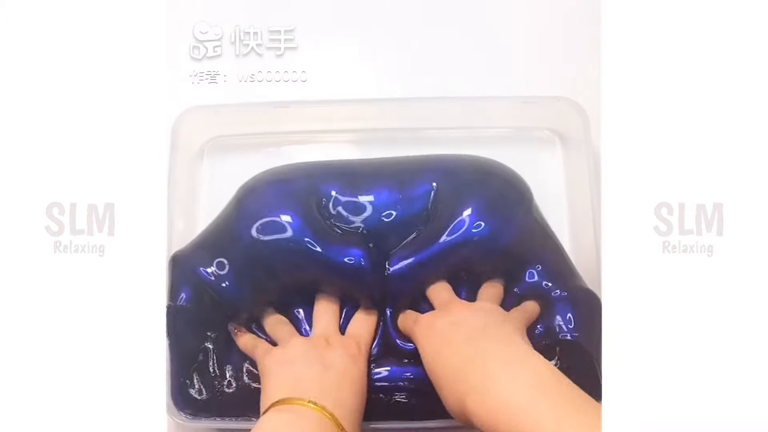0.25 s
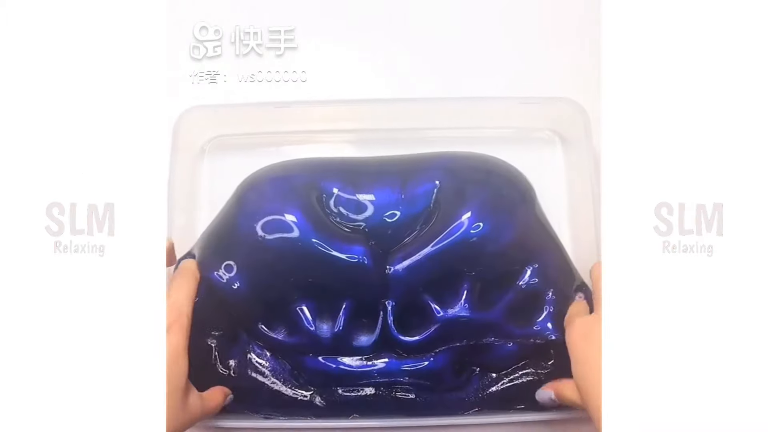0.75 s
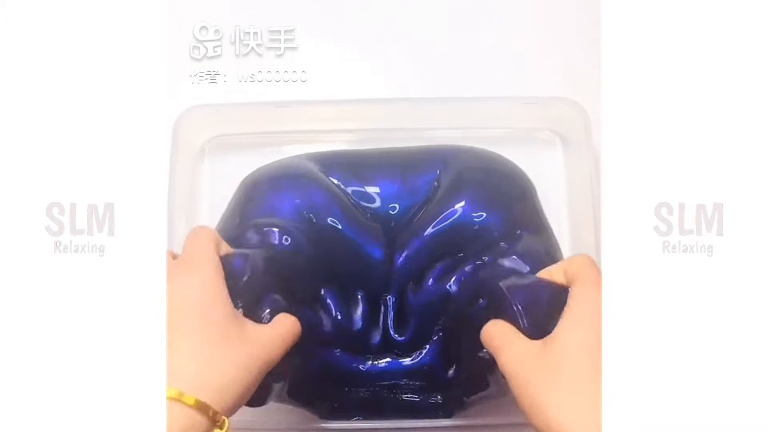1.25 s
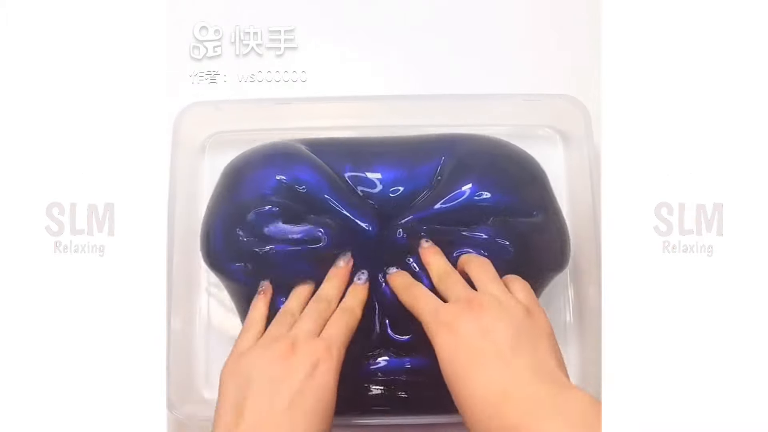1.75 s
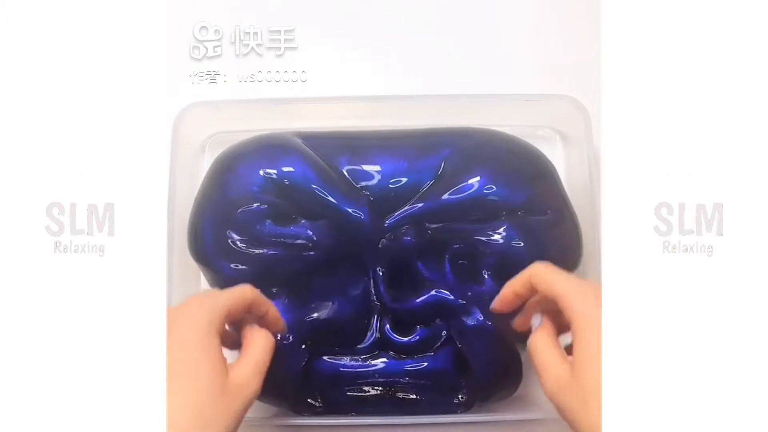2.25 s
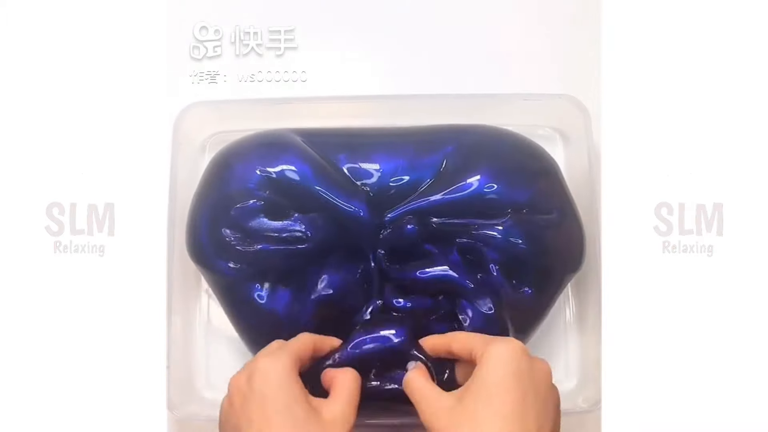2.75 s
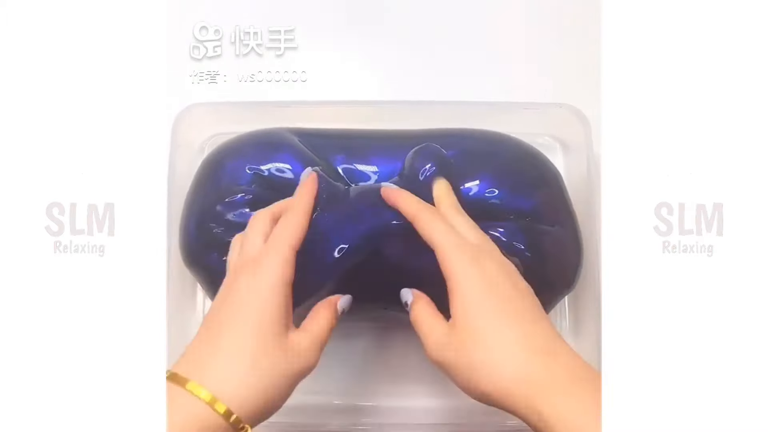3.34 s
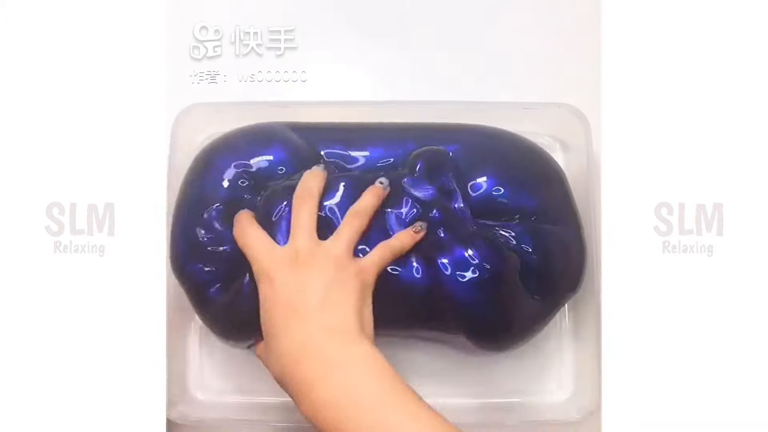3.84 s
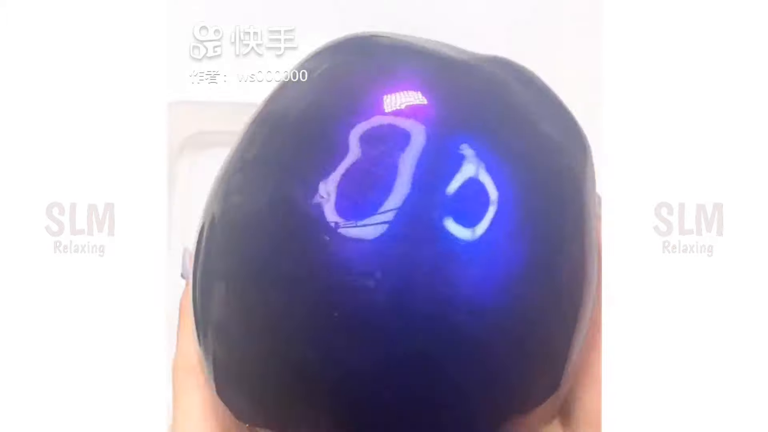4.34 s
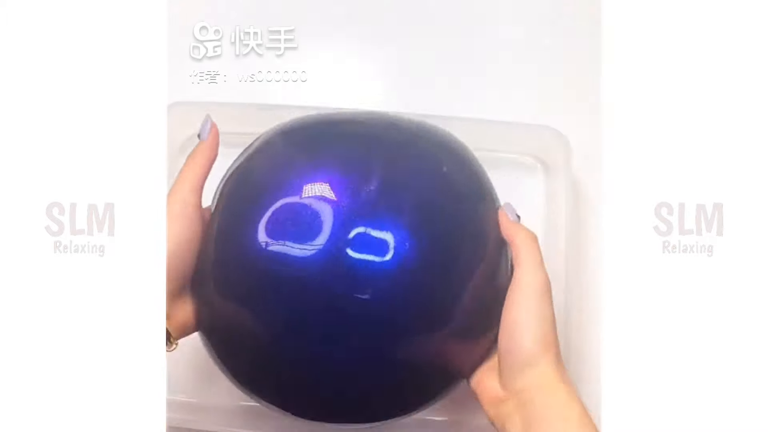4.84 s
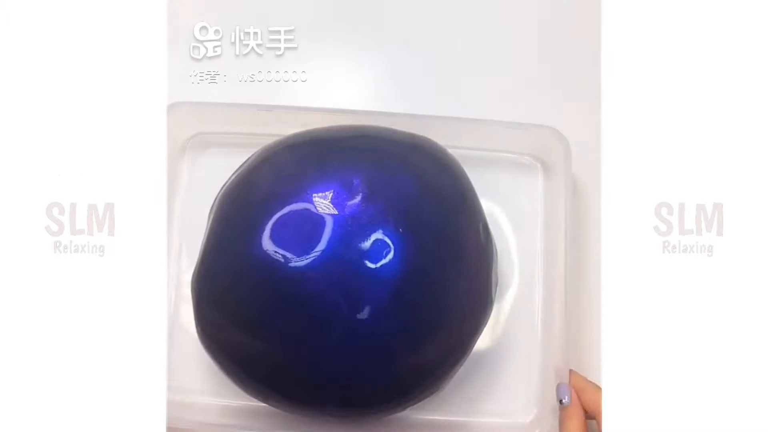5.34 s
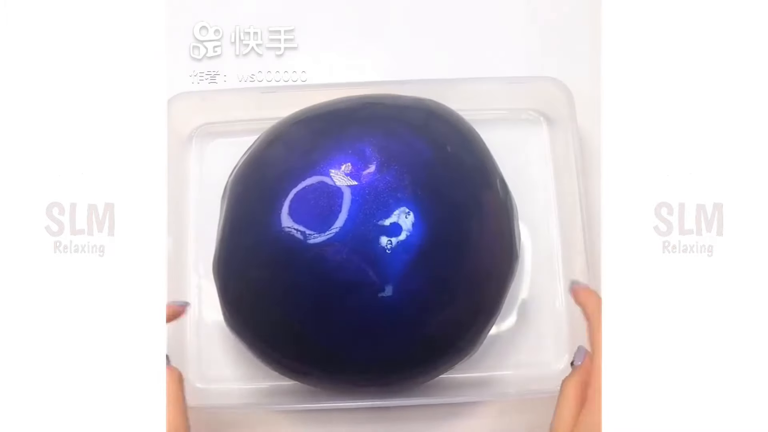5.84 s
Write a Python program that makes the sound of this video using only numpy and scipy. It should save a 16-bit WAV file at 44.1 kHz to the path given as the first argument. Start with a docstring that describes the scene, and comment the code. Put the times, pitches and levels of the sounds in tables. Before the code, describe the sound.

Fingers press and fold sticky slime in a plastic tray, with sharp wet pops, snapping crackles and soft tray thumps, very close.

```python
"""Small room: fingers press, fold and lift a slab of sticky slime in a plastic tray, close to a phone microphone.
Bursting air pockets are short gusts of sine and resonant noise, with a crack, a hollow ring and a wet tail.
Rips are dense tiny snaps and sucked-in air; sliding, swish, crackle, rumble and hiss are coloured noise.
The tray is three resonances struck by soft tugs; the loudest peaks overload the recorder."""
import sys
import numpy as np
from scipy import signal
from scipy.fft import rfft, irfft
from scipy.io import wavfile
from scipy.ndimage import uniform_filter1d

SR = 44100
rng = np.random.default_rng(int(sys.argv[2]) if len(sys.argv) > 2 else 0)


def digitize_waveform(pressure):
    """Quantize a signal to 16-bit integers and store it at the path in sys.argv[1].

    Rows of a 2-D input are taken as channels; values are limited to [-1, 1].
    """
    field = np.atleast_2d(pressure).T
    bounded = np.clip(field, -1, 1)
    quanta = np.round(bounded * 32767).astype(np.int16)
    wavfile.write(sys.argv[1], SR, quanta)


N = 269010

# Spectra: (frequency [Hz], relative level [dB])
HISS_SPECTRUM = [(350, -36), (600, 1.5), (1330, -11.5), (6200, -12.5), (14900, -15), (16000, -12)]
RUMBLE_SPECTRUM = [(15, -105), (25, -26), (97, 10), (144, -2.5), (189, -4.5), (317, -7), (638, -10.5),
                   (880, -16), (1800, -19), (2340, -23), (3960, -120)]
SLIDING_SPECTRUM = [(700, -38.5), (1300, -13), (1900, -5), (2450, -1.5), (3200, -4), (4500, -7.5),
                    (5900, -20.5)]
CRACKLE_SPECTRUM = [(2240, -85), (3800, -4), (5420, 7), (8360, 1), (15200, -5.5), (16000, -101)]
SWISH_SPECTRUM = [(530, -51), (900, -15), (3000, 0), (4860, -4), (11400, -10), (16000, -13)]
TEAR_SPECTRUM = [(530, -44), (900, -15.5), (1190, -7.5), (1320, -10), (2330, -7), (3300, -8), (5820, -4.5),
                 (16000, -16)]
# Overall gain, dips briefly, then sits 1 dB below its start: (time [s], gain [dB])
OVERALL_GAIN = [(4.07, -3.5), (4.078, -27), (4.108, -17), (4.115, -4.5)]
# Low rumble between bursts: (time [s], level [dB])
RUMBLE_LEVEL = [(0.0, -46.5), (1.6, -45.5), (2.6, -47), (3.1, -46), (3.9, -45), (4.4, -47), (5.0, -49.5),
                (5.6, -44.5), (6.1, -47.5)]
# Tray resonances: (frequency [Hz], gain [dB], t60 [s])
TRAY_MODES = [(99.3, -8, 0.38), (185.2, 7, 0.22), (402, 2, 0.036)]
# Gel tugging at the tray: (time [s], level [dB])
TRAY_TUGS = [(0.278, -37.5), (0.338, -44), (0.587, -29), (0.649, -30), (0.821, -36.5), (0.902, -44),
             (0.946, -36.5), (1.07, -29), (1.099, -52), (1.178, -36), (1.249, -35.5), (1.62, -43),
             (2.332, -45.5), (2.365, -31), (2.52, -36), (2.917, -47), (3.824, -40), (5.299, -34)]
# Hands moving over the gel: (time [s], wet sliding level [dB], fine crackle level [dB])
KNEADING_LEVELS = [(0.0, -51, -48), (0.3, -57, -59), (0.46, -53, -55), (0.78, -61.5, -66),
                   (1.05, -48, -47.5), (1.41, -59, -46), (1.56, -54, -43), (1.75, -68, -70),
                   (2.0, -58, -60), (2.06, -52, -53), (2.3, -54.5, -57), (2.45, -78, -87.5),
                   (2.84, -53, -49.5), (3.02, -59, -52.5), (3.14, -43, -60), (3.26, -48, -47),
                   (3.45, -49, -47), (3.75, -66.5, -63), (4.03, -51.5, -55), (4.3, -58.5, -58.5),
                   (5.1, -63, -62), (5.8, -66, -73), (5.97, -47.5, -54), (6.1, -91, -85)]
# Gel tearing off skin and tray: (top reached [s], level [dB], swell before [s], held [s],
# sag while held [dB], release [s], low squelch re level [dB])
RIP_STROKES = [(0.209, -39, 0.025, 0.08, 5, 0.025, -8), (0.588, -8, 0.0079, 0.055, 21, 0.064, -12.5),
               (0.891, -30, 0.012, 0.041, 16.5, 0.069, -5.5), (1.1, -46, 0.038, 0.04, 19, 0.03, -11),
               (1.17, -28.5, 0.01, 0.082, 14.5, 0.043, -23), (1.359, -49.5, 0.038, 0.033, 2, 0.017, -11),
               (1.448, -42, 0.043, 0.11, 0.5, 0.018, -34), (1.719, -45.5, 0.011, 0.032, 6, 0.02, -17),
               (2.318, -14, 0.023, 0.041, 3.5, 0.045, -15), (2.916, -28.5, 0.1, 0.055, 10.5, 0.059, -3),
               (3.15, -39, 0.055, 0.011, 9, 0.036, -9), (3.354, -36, 0.03, 0.018, 9, 0.023, -11),
               (3.791, -32, 0.05, 0.039, 5.5, 0.044, -19), (4.25, -35.5, 0.049, 0.12, 10.5, 0.042, -12.5),
               (4.597, -32, 0.13, 0.038, 19, 0.023, -37), (5.121, -42, 0.025, 0.1, -4, 0.02, 0),
               (5.266, -16, 0.016, 0.021, 8.5, 0.025, -12.5), (5.299, -45.5, 0.01, 0.091, 19, 0.02, 12.5)]
# Bursting pockets: (time [s], level [dB], nominal pocket pitch [Hz], hollow pitch [Hz],
# hollow re level [dB], crack re level [dB])
POCKETS = [(0.023, -32, 2400, 860, -7, -2.5), (0.078, -33.5, 4270, 854, -22, -12),
           (0.132, -38.5, 1600, 590, 15, -20), (0.19, -42, 6600, 393, -20.5, -12),
           (0.205, -34.5, 4730, 423, -15, -8), (0.229, -34, 4730, 780, -19, -8),
           (0.252, -16.5, 4240, 460, -24, -21), (0.263, -31, 4350, 387, -27.5, 0),
           (0.27, -13, 7520, 450, -15, -5), (0.323, -6, 5915, 470, -20, 2.5),
           (0.432, -34, 5300, 590, -27, 0.5), (0.495, -27, 2040, 538, -19, -18.5),
           (0.543, -26.5, 1980, 465, -5, -18), (0.555, -25, 1940, 706, -12, -9),
           (0.576, -7, 2320, 1460, -17, -0.5), (0.589, -4.5, 2030, 1170, -17, -15),
           (0.614, -20, 4900, 1180, 11, -6), (0.634, -19, 4800, 356, -12, -12),
           (0.813, -15.5, 2570, 1480, -25, -4), (0.834, -19, 2710, 460, -10.5, -16),
           (0.883, -24.5, 1790, 770, 0.5, -22), (0.91, -28.5, 2320, 532, 2, -16),
           (0.938, -24, 2070, 503, 1, -1), (1.015, -38, 2340, 1100, 15, -22),
           (1.036, -30.5, 3980, 514, 3.5, -7), (1.059, -12.5, 2230, 1470, -19, -14.5),
           (1.091, -7, 2270, 1240, 0, -18), (1.1, -11.5, 4100, 610, -13, -29),
           (1.11, -30, 5990, 630, 7.5, -18), (1.144, -8, 4320, 645, -38, -2.5),
           (1.17, -8.5, 3750, 526, -6, -3.5), (1.185, -8.5, 3450, 546, -16.5, -9),
           (1.23, -21.5, 2320, 435, -8.5, -22), (1.243, -18, 2620, 1230, -11, -12),
           (1.26, -24, 1560, 990, -21, -7.5), (1.327, -39.5, 1780, 1160, 7, -12),
           (1.352, -26, 7460, 783, -27, -6), (1.443, -33.5, 6200, 366, -7, 4.5),
           (1.521, -33, 8270, 1470, -28, -8), (1.544, -24.5, 5450, 1400, -30, -5),
           (1.72, -41, 2980, 586, -18, -3), (1.783, -39.5, 2970, 1270, -17, 1.5),
           (1.794, -41.5, 6200, 600, -23, -6), (1.877, -48, 5870, 604, -20, -3),
           (1.95, -33.5, 4270, 395, -22, -4.5), (2.018, -30, 7200, 395, -20, -15.5),
           (2.0238, -9.5, 7270, 1210, -42, -16), (2.0266, -12, 6530, 1400, -42, -23),
           (2.126, -37.5, 5980, 413, -8, -17), (2.143, -37.5, 6200, 385, -14, -12),
           (2.156, -44.5, 5660, 402, -8, -7), (2.265, -48, 6340, 402, -6, -14),
           (2.313, -17.5, 7070, 686, -26, 6.5), (2.323, -11, 5780, 386, -3.5, 4),
           (2.333, -12, 4800, 414, -11, -15), (2.508, -10.5, 1930, 597, -10, -10),
           (2.882, -34, 7600, 730, -1, -8.5), (2.895, -33, 4360, 490, -19, -17),
           (2.915, -21, 1350, 953, 4, -20.5), (2.967, -31.5, 5500, 374, -22, -1),
           (3.23, -34.5, 6830, 840, -10, -8), (3.298, -35.5, 2400, 1440, -21, -10),
           (3.347, -31.5, 9700, 657, -28, -23), (3.359, -32.5, 4400, 630, -19, 1),
           (3.706, -42.5, 6270, 604, 8, -10), (3.791, -25, 6150, 428, -31, 5),
           (3.813, -26, 3940, 447, -26, -19), (4.115, -33.5, 1530, 1540, 1, -2.5),
           (4.247, -30.5, 9100, 970, -2, -12), (4.264, -27.5, 3630, 906, 0, -18),
           (4.364, -35, 4130, 880, -28, 3), (4.444, -47, 5500, 600, -20, -6),
           (4.467, -48, 4460, 595, -25, -20), (4.56, -34, 4730, 977, -28, -1),
           (4.576, -27, 8300, 670, -16, -6), (4.595, -19, 5430, 1290, 1, -24),
           (4.646, -33.5, 7920, 673, -0.5, 3.5), (4.724, -29.5, 5650, 530, -17, 2.5),
           (4.731, -26.5, 7780, 576, -29, -11), (4.74, -28, 6680, 402, -12.5, -5),
           (5.097, -39.5, 3430, 980, 11, -16), (5.109, -19.5, 2900, 943, -1.5, -15),
           (5.138, -40, 7640, 600, -18, 0), (5.159, -4, 3190, 1220, 2, -7.5), (5.234, -7, 3120, 1280, 2, 0),
           (5.263, -6.5, 3520, 1316, 3.5, -6), (5.282, -16, 3170, 584, -8, -4),
           (5.298, -19, 1410, 580.7, 7, -27), (5.476, -7, 3650, 970, -45, -4.5),
           (5.511, -12, 5560, 543, -17, -7.5), (5.526, -14.5, 1810, 1500, -23, -3.5),
           (5.562, -28.5, 3500, 570, -10, -20.5), (5.934, -39.5, 1810, 670, -1, -1.5)]

HISS_DB = -57.5
ROOM_DB, ROOM_T60_S, WALL_CUT_HZ = -19.5, 0.13, 5600
SHAKE_SHARE, SHAKE_SMOOTHING_S = 0.084, 0.026   # share of the gel's level that adds to the rumble
SWISH_S, SWISH_DB, SWISH_SWELL_S, SWISH_HELD_S, SWISH_RELEASE_S = 5.575, -37, 0.064, 0.14, 0.086
STROKE_EDGE_DB = 39   # span of swell and of release
SQUELCH_LAG_S, SQUELCH_RELEASE_RATIO = 0.01, 1.7
OPENING_MS = 1.856   # time scale of an opening mouth
POCKET_NOISE, PITCH_SAG, SKIRT_DB, HOLLOW_T60_CYCLES = 0.8, 0.3, -5.5, 34.2
# wet tail at a 0 dB pocket; dB change per dB of pocket level
TAIL_DB, TAIL_DB_PER_DB, TAIL_T60_S = -23.5, 0.99, 0.14
LOW_CUT_HZ, CEILING, STOP_EDGE_HZ = 136, 0.47, 16800


def from_db(db):
    """Amplitude gain of a level in dB."""
    return 10 ** (np.asarray(db) / 20)


def rms_one(x):
    """Scale to rms 1."""
    return x / np.sqrt(np.mean(x ** 2) + 1e-20)


def white():
    """White noise over the whole scene."""
    return rng.standard_normal(N)


def in_time(rows, outside=None):
    """Table columns, linearly interpolated at every sample."""
    times_s, *columns = np.transpose(rows)
    now_s = np.arange(N) / SR
    return [np.interp(now_s, times_s, c, left=outside, right=outside) for c in columns]


def coloured(x, spectrum):
    """Causal minimum-phase filter with the given spectrum; rms 1."""
    hz, level_db = np.transpose(spectrum)
    grid_hz = np.maximum(np.fft.rfftfreq(8192, 1 / SR), 1)
    log_gain = np.interp(np.log(grid_hz), np.log(hz), level_db) * np.log(10) / 20
    cepstrum = irfft(log_gain)
    # fold to the causal half: minimum phase
    cepstrum[1:4096] *= 2
    cepstrum[4097:] = 0
    impulse_response = irfft(np.exp(rfft(cepstrum)))
    return rms_one(signal.fftconvolve(x, impulse_response)[:N])


def drift(rate_hz):
    """Slow random fluctuation: noise through two equal low-pass poles; rms 1."""
    r = np.exp(-2 * np.pi * rate_hz / SR)
    settling = 9000
    noise = rng.standard_normal(N + settling)
    return rms_one(signal.lfilter([1], [1, -2 * r, r * r], noise)[settling:])


def ring(x, hz, t60_s):
    """Two-pole resonance: a unit click sets a decaying sine of height 1 ringing."""
    r, w = from_db(-60 / (t60_s * SR)), 2 * np.pi * hz / SR
    return signal.lfilter([0, np.sin(w)], [1, -2 * r * np.cos(w), r * r], x + 1e-18)


def hollowed(x, hz, cycles):
    """Twice through one resonance (t60 in cycles): a soft-edged band; rms 1."""
    t60_s = cycles / hz
    return rms_one(ring(ring(x, hz, t60_s), hz, t60_s))


def stroke_db(top_s, level_db, swell_s, held_s, release_s, sag_db):
    """Swell, sagging hold and release of one stroke, in dB at every sample."""
    times_s = np.cumsum([top_s - swell_s, swell_s, held_s, release_s])
    steps_db = level_db - np.array([STROKE_EDGE_DB, 0, sag_db, sag_db + STROKE_EDGE_DB])
    return in_time(np.transpose([times_s, steps_db]), outside=-120)[0]


def snaps(clumps_per_s, per_s=2500, spread_db=4.5, cycles=16.0, clump_db=3.0):
    """Gel threads snap at random, in clumps; each tiny pocket rings briefly at its own pitch."""
    sizes = from_db(spread_db * np.minimum(rng.exponential(1, N), 4)) * rng.choice([-1, 1], N)
    clicks = sizes * (rng.random(N) < per_s / SR)
    pitches_hz = np.geomspace(600, 16000, 20)
    dealt = rng.integers(0, 20, N)
    rings = np.zeros(N)
    for k, hz in enumerate(pitches_hz):
        rings += hollowed(clicks * (dealt == k), hz, cycles) * hz ** .5
    return rings * from_db(clump_db * drift(clumps_per_s))


def room_noise():
    """Steady soft hiss: coloured noise."""
    return from_db(HISS_DB) * coloured(white(), HISS_SPECTRUM)


def room(x):
    """Reverberation: eight feedback delays, duller on every round."""
    out, dull = np.zeros(N), np.exp(-2 * np.pi * WALL_CUT_HZ / SR)
    for k, lag in enumerate((np.geomspace(.0071, .031, 8) * SR).astype(int)):
        gain = from_db(-60 * lag / SR / ROOM_T60_S)
        loop, state = x.copy(), [0.]
        # one delay-length block at a time
        for i in range(lag, N, lag):
            back, state = signal.lfilter([gain * (1 - dull)], [1, -dull], loop[i - lag:i], zi=state)
            loop[i:i + lag] += back[:N - i]
        out += (loop - x) * (-1) ** k
    return out


def rumble(gel):
    """Low noise of hands, tray and room, swelling with the smoothed level of the gel."""
    noise = coloured(white(), RUMBLE_SPECTRUM) * from_db(0.84 * drift(11.0))
    memory = np.exp(-1 / (SHAKE_SMOOTHING_S * SR))
    shaking = SHAKE_SHARE * signal.lfilter([1 - memory], [1, -memory], np.abs(gel))
    level_db, = in_time(RUMBLE_LEVEL)
    return (from_db(level_db) + shaking) * noise


def tray():
    """Thin plastic tray: low resonances struck by low-passed tugs."""
    times_s, level_db = np.transpose(TRAY_TUGS)
    force = np.zeros(N)
    force[np.round(times_s * SR).astype(int)] = from_db(level_db)
    soft = signal.sosfilt(signal.butter(2, 300, fs=SR, output="sos"), force)
    return sum(from_db(gain_db) * ring(soft, hz, t60_s) for hz, gain_db, t60_s in TRAY_MODES)


def kneading():
    """Gel surface under the hands: wet sliding noise and fine crackle of snaps and noise."""
    sliding_db, crackle_db = in_time(KNEADING_LEVELS)
    sliding = coloured(white(), SLIDING_SPECTRUM) * from_db(1.7 * drift(25) + 2.0 * drift(16.0))
    grains = coloured(snaps(clumps_per_s=30), CRACKLE_SPECTRUM)
    fizz = coloured(white(), CRACKLE_SPECTRUM) * from_db(2 * drift(30))
    crackle = .8 * grains + .6 * fizz
    return from_db(sliding_db) * sliding + from_db(crackle_db + 1.7 * drift(7.2)) * crackle


def swish():
    """Slab sliding wetly across the tray: an even hiss, rising 1 dB while held."""
    level_db = stroke_db(SWISH_S, SWISH_DB, SWISH_SWELL_S, SWISH_HELD_S, SWISH_RELEASE_S, sag_db=-1.0)
    return from_db(level_db + 0.31 * drift(44)) * coloured(white(), SWISH_SPECTRUM)


def rips():
    """Gel tearing off: dense snaps and sucked-in air per stroke, with a later low wet squelch."""
    threads = coloured(snaps(clumps_per_s=60), TEAR_SPECTRUM)
    suction = coloured(white(), TEAR_SPECTRUM) * from_db(3.2 * drift(54))
    tearing = .9 * threads + .45 * suction
    wet = hollowed(white(), 565, 0.82) * from_db(0.63 * drift(40.0))
    tear_gain, squelch_gain = np.zeros(N), np.zeros(N)
    for top_s, level_db, swell_s, held_s, sag_db, release_s, low_db in RIP_STROKES:
        tear_gain += from_db(stroke_db(top_s, level_db, swell_s, held_s, release_s, sag_db))
        squelch_gain += from_db(stroke_db(top_s + SQUELCH_LAG_S, level_db + low_db, swell_s, held_s,
                                          release_s * SQUELCH_RELEASE_RATIO, sag_db))
    return tear_gain * tearing + squelch_gain * wet


def pops():
    """Air rushes from each pocket, singing at its size; film cracks, hollow rings, wet threads trail."""
    length = 4096
    out, t = np.zeros(N + length), np.arange(length) / SR
    noise = rng.standard_normal((len(POCKETS), 3, length))
    treble = signal.butter(2, [4500, 13500], "band", fs=SR, output="sos")
    u = t / (OPENING_MS / 1000)
    gust = np.sqrt(u) * np.exp(-u ** 1.5) * 2   # quick rise, short top, quick fall
    glide = 1 + PITCH_SAG * (np.exp(-2 * u) - .4)   # mouth starts tight and high, then slackens
    for (s, level_db, hz, hollow_hz, hollow_db, crack_db), (air, hiss, gargle) in zip(POCKETS, noise):
        tone = np.sin(2 * np.pi * np.cumsum(hz * glide) / SR)
        pocket = tone + POCKET_NOISE * hollowed(air, hz, 14.2)
        skirt = from_db(SKIRT_DB) * hollowed(hiss, hz, 0.83)   # torn mouth hisses around the pitch
        octave_down = hollowed(gargle, .5 * hz, 13.0)   # deeper part of the pocket
        crack = from_db(crack_db) * rms_one(signal.sosfilt(treble, hiss))
        burst = (pocket + skirt + 0.17 * octave_down + crack) * gust

        tail_db = TAIL_DB + (TAIL_DB_PER_DB - 1) * level_db - 60 * t / TAIL_T60_S
        threads = hollowed(air, hz, 3.5) + 0.51 * octave_down + 0.87 * crack
        threads *= from_db(tail_db) * np.minimum(u, 1)
        threads *= from_db(4 * rms_one(uniform_filter1d(gargle, size=90)))   # they part unevenly

        hollow = np.sin(2 * np.pi * hollow_hz * t) + .8 * hollowed(gargle, hollow_hz, 2.5)
        hollow *= from_db(hollow_db - 60 * t * hollow_hz / HOLLOW_T60_CYCLES)
        hollow *= np.minimum(t / 0.0088, 1)   # 8.8 ms onset
        at = round(s * SR)
        out[at:at + length] += from_db(level_db) * (burst + threads + hollow)
    return out[:N]


def scene():
    """Pops, rips and swish with reverberation, over tray, kneading, rumble and room noise."""
    gel = pops() + rips() + swish()
    surroundings = tray() + kneading() + rumble(gel) + room_noise()
    gain_db, = in_time(OVERALL_GAIN)
    mix = gel + from_db(ROOM_DB) * room(gel) + surroundings
    return (from_db(gain_db) * mix)[None]


def record(dry):
    """Small microphone: deep bass drops, the highest peaks flatten, the top is cut."""
    thin = signal.sosfilt(signal.butter(2, LOW_CUT_HZ, "high", fs=SR, output="sos"), dry)
    flattened = thin / (1 + (thin / CEILING) ** 4) ** .25
    return signal.sosfilt(signal.cheby2(20, 60, STOP_EDGE_HZ, fs=SR, output="sos"), flattened)


dry = scene()
out = record(dry)
digitize_waveform(out)
```